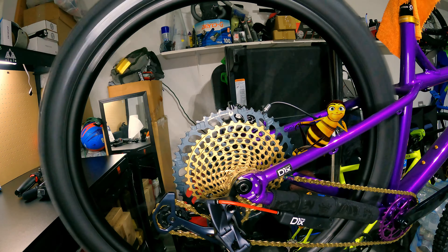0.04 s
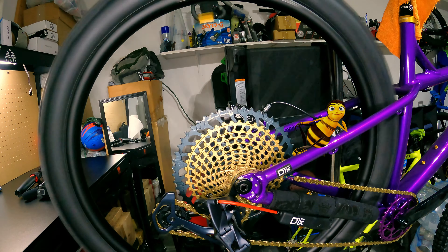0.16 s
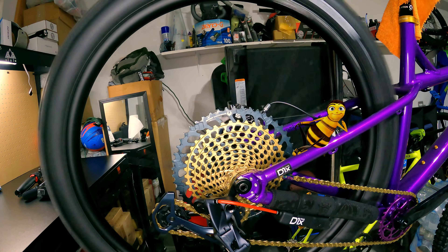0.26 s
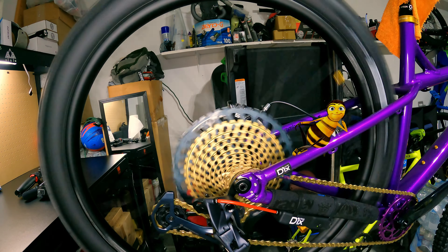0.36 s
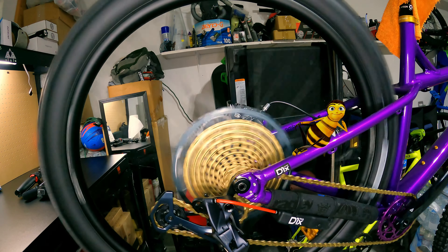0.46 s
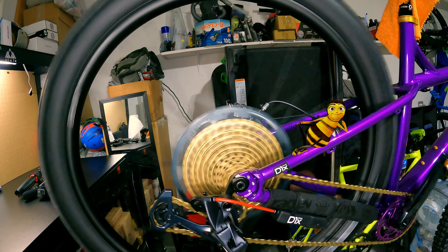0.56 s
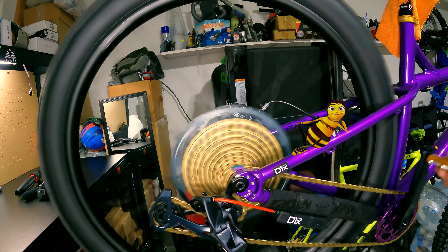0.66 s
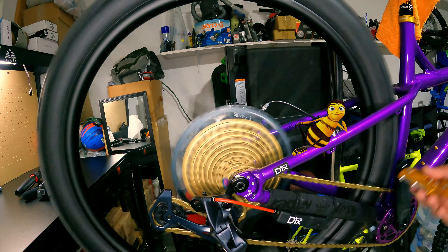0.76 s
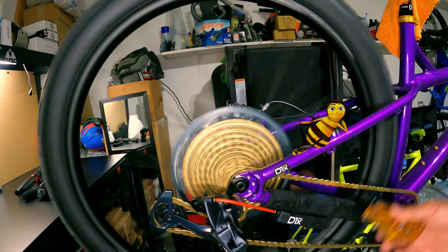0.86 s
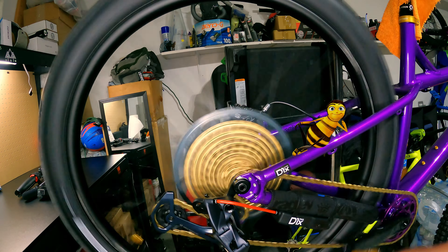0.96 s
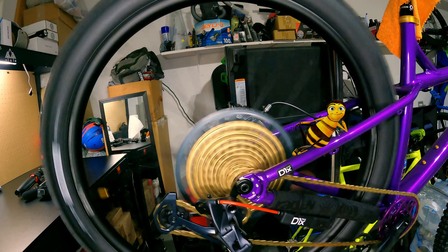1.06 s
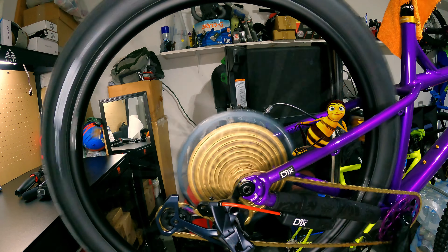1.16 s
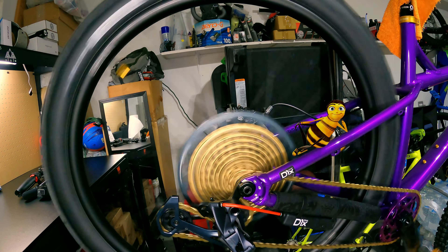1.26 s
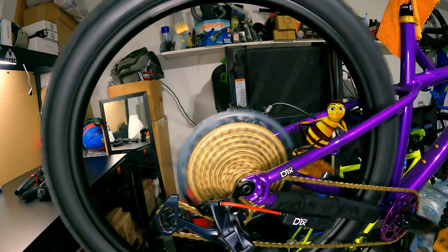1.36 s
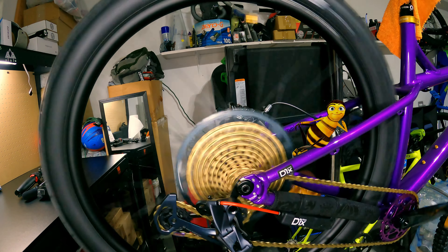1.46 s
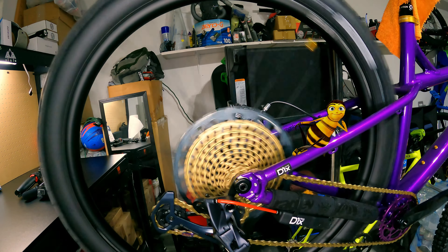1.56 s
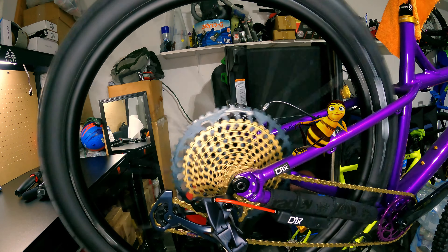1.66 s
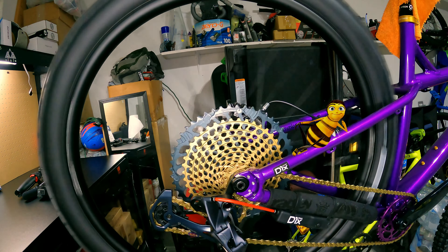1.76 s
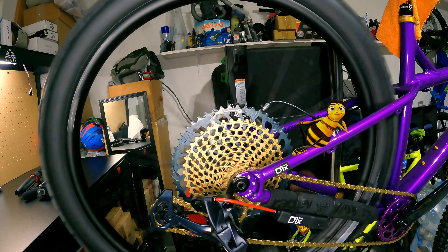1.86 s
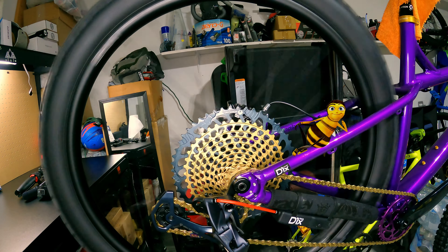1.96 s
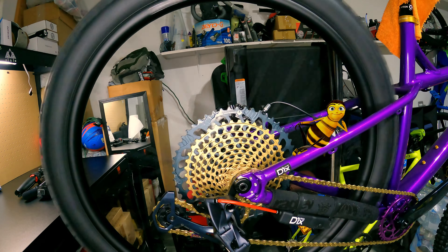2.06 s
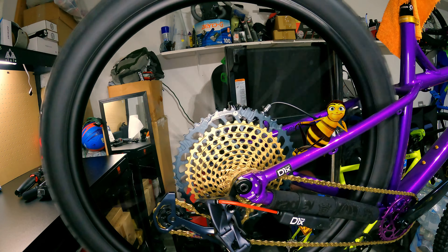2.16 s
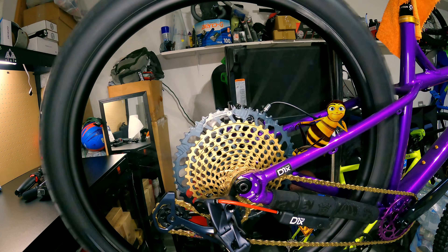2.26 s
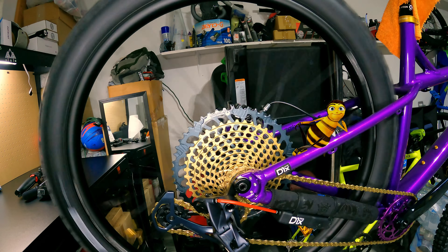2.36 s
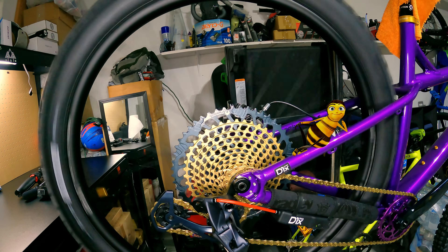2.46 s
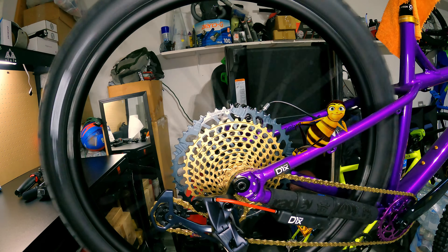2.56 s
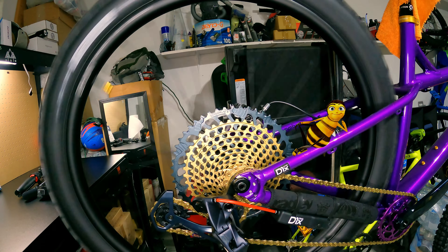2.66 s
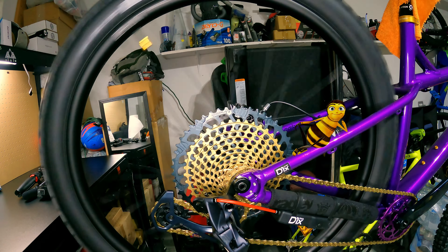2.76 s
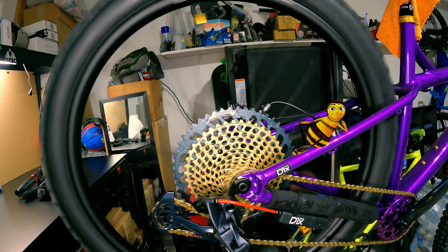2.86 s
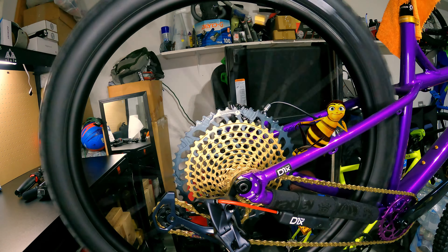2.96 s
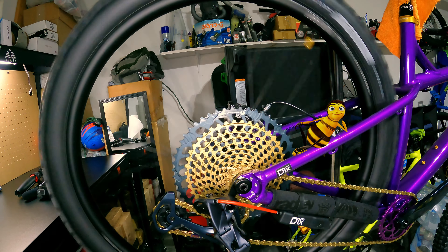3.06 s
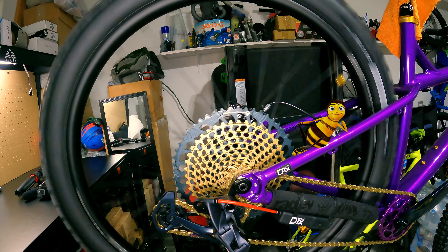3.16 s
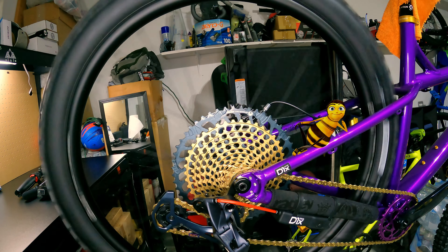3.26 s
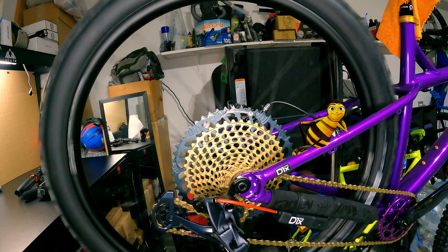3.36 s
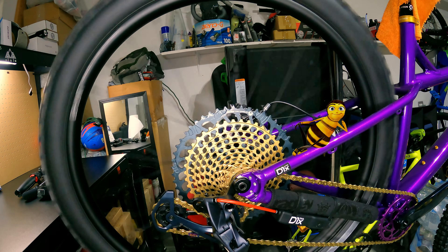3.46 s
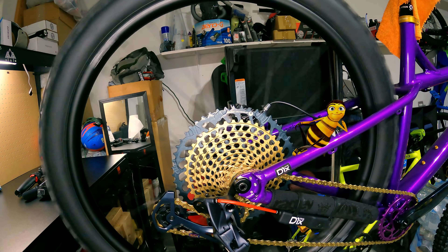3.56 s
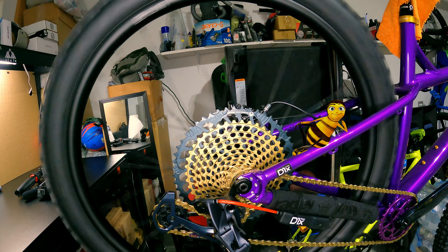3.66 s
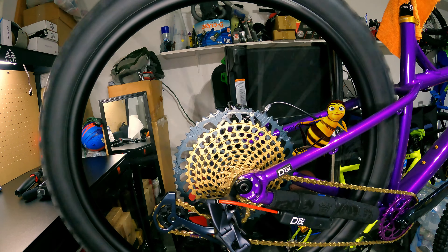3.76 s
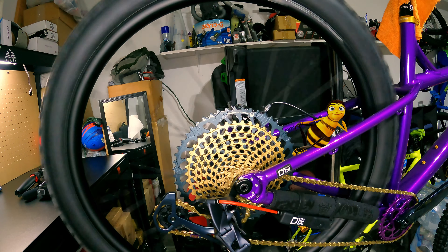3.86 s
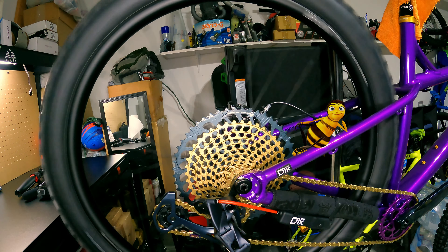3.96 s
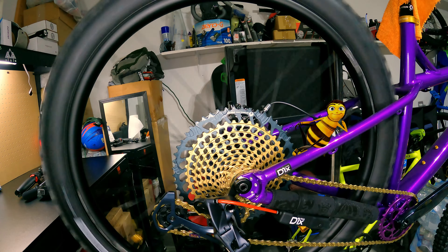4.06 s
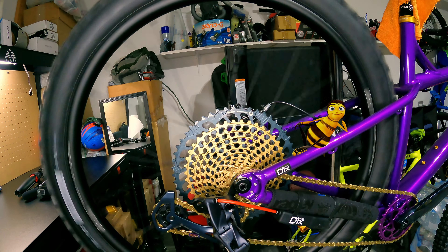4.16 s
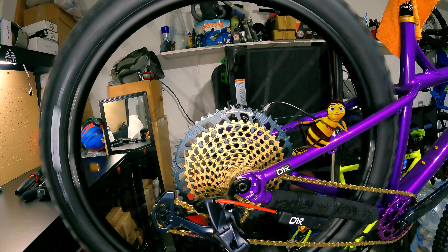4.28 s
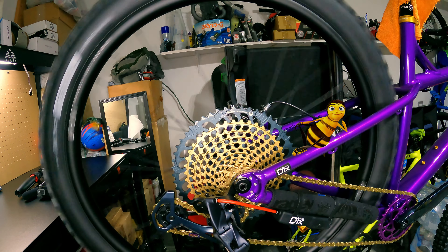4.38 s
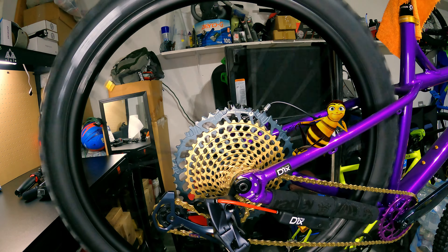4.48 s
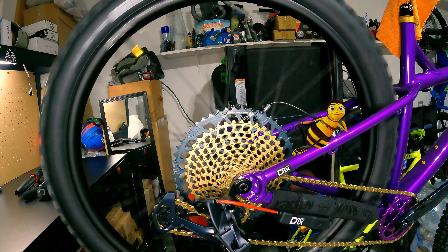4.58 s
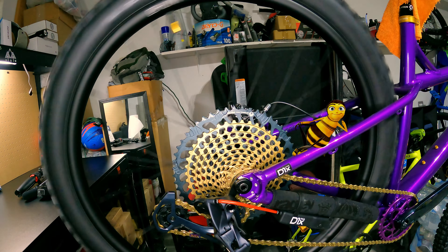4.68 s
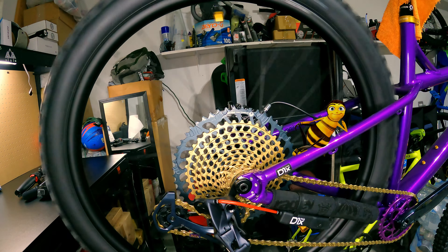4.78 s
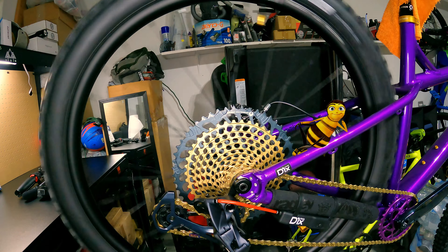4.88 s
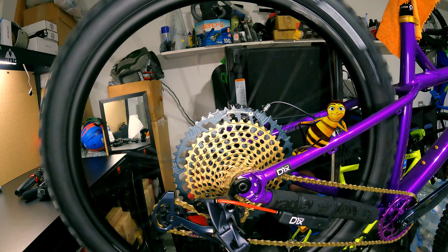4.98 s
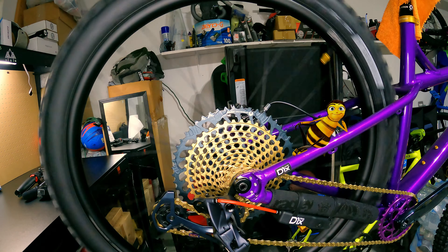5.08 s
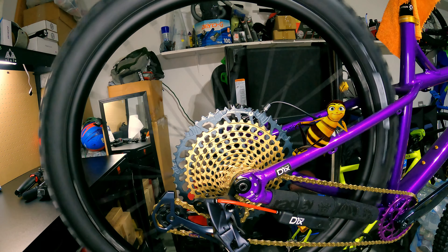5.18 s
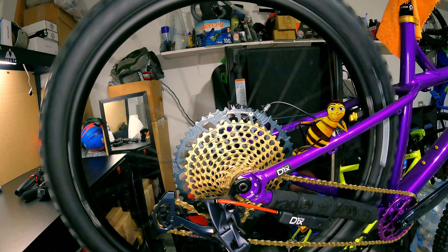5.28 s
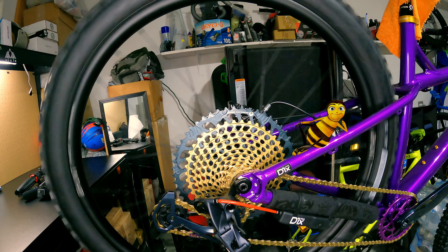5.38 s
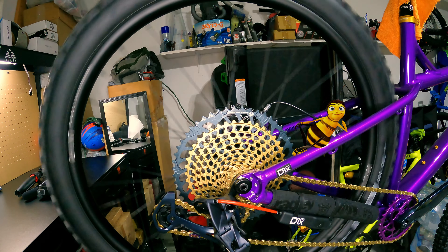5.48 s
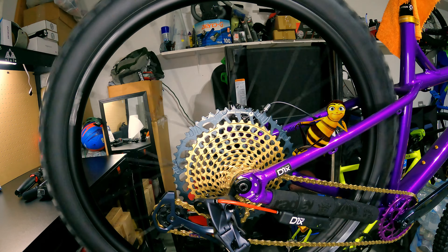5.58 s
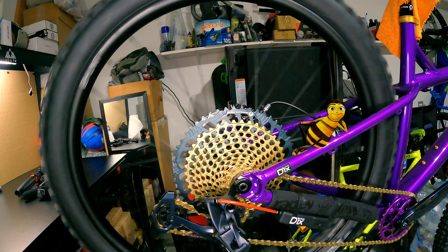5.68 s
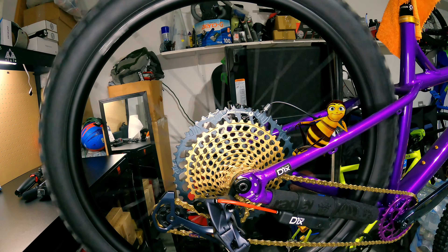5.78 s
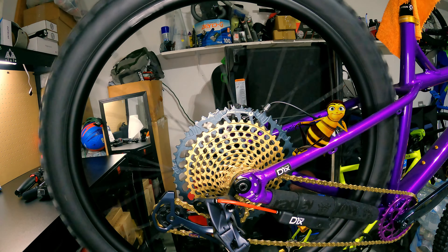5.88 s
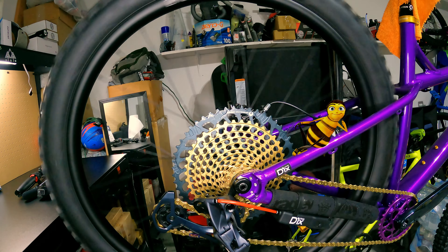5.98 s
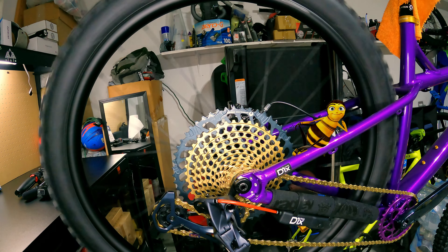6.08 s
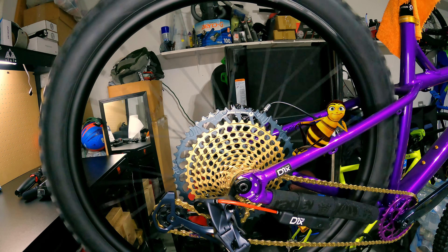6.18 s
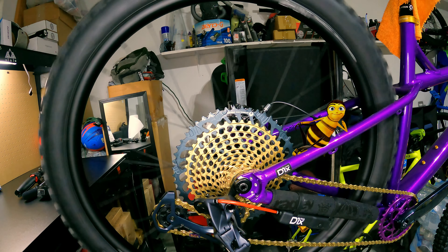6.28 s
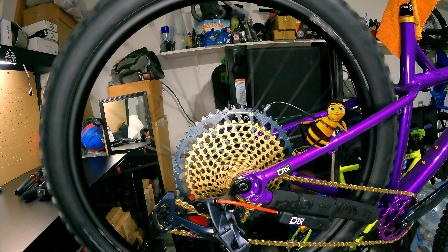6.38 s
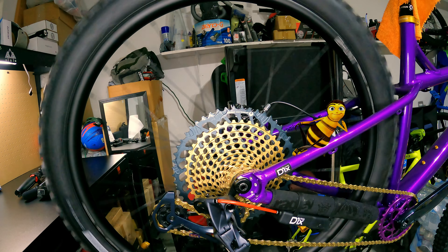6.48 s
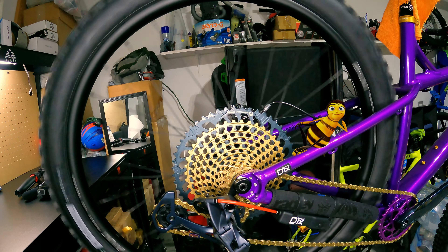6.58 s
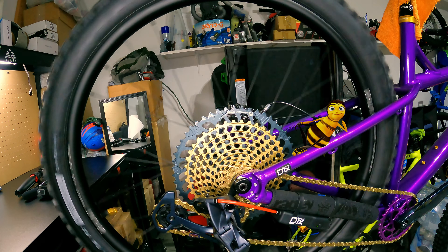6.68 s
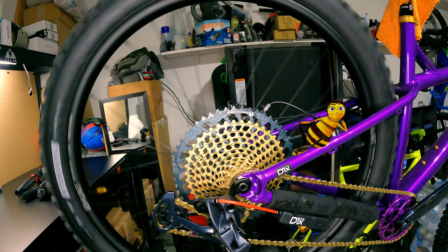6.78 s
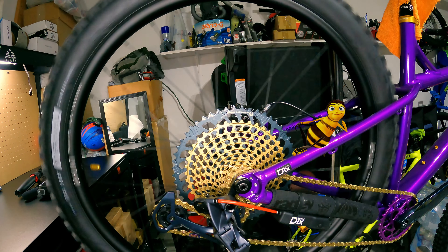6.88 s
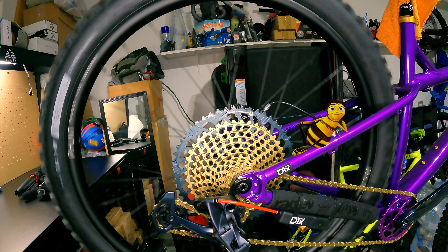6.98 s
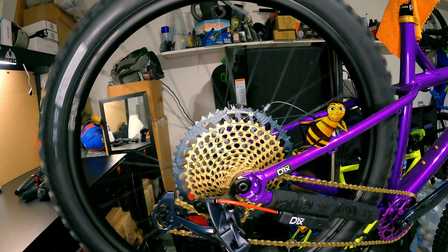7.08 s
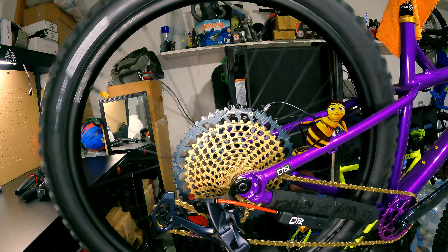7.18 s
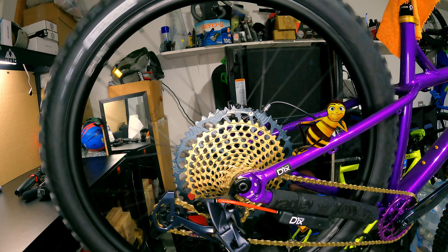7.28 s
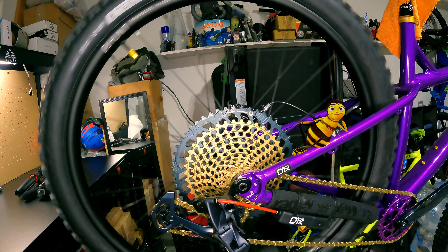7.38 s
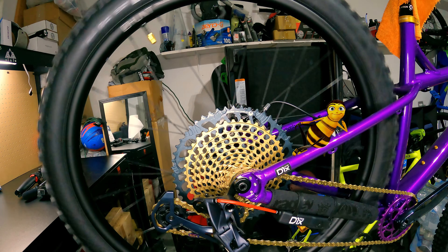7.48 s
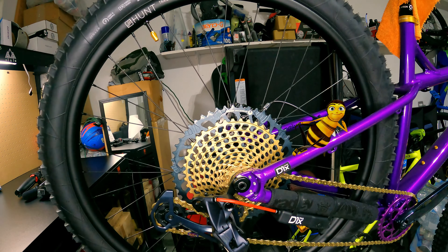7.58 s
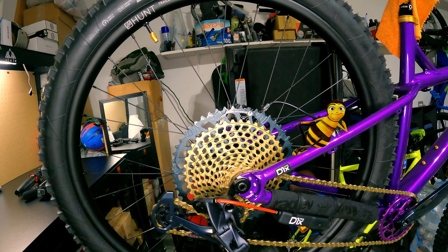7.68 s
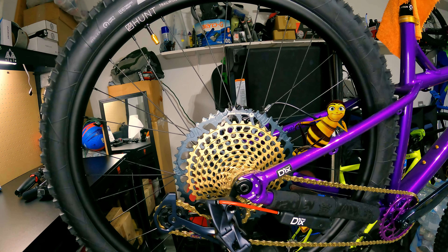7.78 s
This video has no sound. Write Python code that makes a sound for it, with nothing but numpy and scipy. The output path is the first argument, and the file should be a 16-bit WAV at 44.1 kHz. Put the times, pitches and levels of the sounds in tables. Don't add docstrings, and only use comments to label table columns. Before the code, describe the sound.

A fast metallic freewheel buzz starts at once, rises within the first second into a dense ringing whine with a dull chain rumble, then drops before two seconds. The ticking wavers and slows steadily until single clicks stand apart. A hard double knock and faint brake chirps end the spin. One close microphone catches the small room's reflections, steady low hum, soft air noise and dim passing vehicles.

```python
import sys
import numpy as np
from scipy import signal
from scipy.fft import rfft, irfft, next_fast_len
from scipy.io import wavfile
from scipy.ndimage import uniform_filter1d

SR = 44100
rng = np.random.default_rng(int(sys.argv[2]) if len(sys.argv) > 2 else 0)


def level_to_linear(level):
    exponent = np.asarray(level, float) / 20
    return 10 ** exponent


def waveform_to_disk(signal):
    frames = np.transpose(np.atleast_2d(signal))
    scaled = np.clip(frames, -1, 1) * 32767
    samples = np.round(scaled).astype(np.int16)
    wavfile.write(sys.argv[1], SR, samples)


N = 345739


def rms_one(x):
    return x / np.sqrt(np.mean(x ** 2) + 1e-20)


def in_time(rows):
    s, *columns = np.transpose(rows)
    return [np.interp(np.arange(N) / SR, s, c) for c in columns]


def at_hz(points, hz):
    points = np.array(points)
    return np.interp(np.log(hz), np.log(points[:, 0]), points[:, 1])


def ring(clicks, hz, t60):
    r, w = level_to_linear(-60 / (t60 * SR)), 2 * np.pi * hz / SR
    return signal.lfilter([0, np.sin(w)], [1, -2 * r * np.cos(w), r * r], clicks + 1e-18)


def resonate(x, hz, width_hz):
    r = np.exp(-np.pi * width_hz / SR)
    poles = [1, -2 * r * np.cos(2 * np.pi * hz / SR), r * r]
    return signal.lfilter([(1 - r * r) / 2, 0, (r * r - 1) / 2], poles, x + 1e-18)


def band(x, low, high, order=2):
    return signal.sosfilt(signal.butter(order, [low, high], "band", fs=SR, output="sos"), x)


def fading(clicks, t60):
    keep = level_to_linear(-120 / (t60 * SR))
    return np.sqrt(signal.lfilter([1 - keep], [1, -keep], clicks ** 2 + 1e-18))


def wander(n, samples):
    once = uniform_filter1d(rng.standard_normal(n), size=samples)
    return rms_one(uniform_filter1d(once, size=samples))


def pressed_db(knee_db=-26.5, press_share=0.84, recover_s=0.61):
    over = np.maximum(in_time(BUZZ)[0] - knee_db, 0)
    keep = np.exp(-1 / (recover_s * SR))
    return press_share * signal.lfilter([1 - keep], [1, -keep], over, zi=[over[0]])[0]


# [f/Hz, level/dB per Hz]
AIR = [(25, -17), (60, -10), (110, -7), (170, 1), (210, 1.5), (290, -4), (420, -4), (700, -5), (1200, -6.5),
       (2500, -7.5), (4500, -14.5), (8000, -32), (11000, -54), (15000, -58)]


def workshop(air_db=-44, hum_db=-42.5, hum_wander_db=1.6, hum_hz=238.6, hum_width_hz=1.6):
    drift, pressed = wander(N, 9000), pressed_db()
    air_db = air_db - pressed
    hum_db = hum_db - pressed + hum_wander_db * drift
    size = next_fast_len(N)
    hz = np.maximum(np.fft.rfftfreq(size, 1 / SR), 1)
    air = rms_one(irfft(rfft(rng.standard_normal(size)) * level_to_linear(at_hz(AIR, hz)), size)[:N])
    waver = rms_one(resonate(rng.standard_normal(N), hum_hz, hum_width_hz))
    hum = np.sqrt(2) * np.sin(2 * np.pi * hum_hz * np.arange(N) / SR) + 0.36 * waver
    whistle = rms_one(resonate(rng.standard_normal(N), 413.7, 6.8))
    return level_to_linear(air_db + 4.0) * air + level_to_linear(hum_db - 1.5) * hum + level_to_linear(air_db - 13.5) * whistle


# [loudest t/s, half length t/s, level/dB, low f/Hz, high
# f/Hz]
TRAFFIC = [
    (3.3, 0.84, -42, 423, 1600),
    (3.6, 0.57, -50.5, 102, 266),
    (4.7, 0.84, -47.5, 150, 300),
]


def traffic():
    s, out = np.arange(N) / SR, np.zeros(N)
    for top, half, level_db, low_hz, high_hz in TRAFFIC:
        swell = level_to_linear(level_db) * np.exp(-((s - top) / half) ** 2)
        out += swell * rms_one(band(rng.standard_normal(N), low_hz, high_hz))
    return out


# [t/s, speed/ticks per s]
CRANK = [
    (.394, 0),
    (.601, 211.8),
    (.71, 272.3),
    (.88, 326.6),
    (1.089, 455.8),
    (1.294, 459.3),
    (1.345, 445.5),
    (1.487, 345.1),
    (1.874, 0),
]
# [start t/s, fastest t/s, end t/s, speed/ticks per s]
ROCKING = [
    (2.07, 2.346, 2.446, 21.37),
    (2.714, 3.245, 3.438, -19.18),
]


def spin():
    start, friction, drag_s = 107.45, 185.2, 24.25
    heavy_swing, ticks_per_turn, heavy_start_turns = 56.9, 122.72, .291
    s = np.arange(N) / SR
    wheel = (start + friction) * np.exp(-s / drag_s) - friction
    turns = heavy_start_turns + np.cumsum(wheel) / SR / ticks_per_turn
    heavy = heavy_swing * np.sin(2 * np.pi * turns) / wheel
    rocking = sum(np.interp(s, [begin, top, end], [0, speed, 0]) for begin, top, end, speed in ROCKING)
    return wheel + heavy + in_time(CRANK)[0] + rocking


def chain(level_db=-46.5, low_hz=300, high_hz=900):
    speed = in_time(CRANK)[0]
    rumble = rms_one(band(rng.standard_normal(N), low_hz, high_hz))
    return level_to_linear(level_db) * np.sqrt(speed / speed.max()) * rumble


# [t/s, level/dB, f/Hz, length t/s]
SQUEAKS = [
    (7.707, -37, 3520, 0.013),
    (7.745, -38, 3500, .013),
    (7.774, -41, 3590, 0.017),
]


def squeaks():
    out = np.zeros(N)
    for s, level_db, hz, length in SQUEAKS:
        age = np.arange(N) / SR - s
        swell = np.sin(np.pi * np.clip(age / length, 0, 1))
        out += level_to_linear(level_db) * swell * np.sin(2 * np.pi * hz * age)
    return out


# [t/s, peak level/dB]
CLACK = [
    (7.626, -15.5),
    (7.633, -19.5),
]
# [f/Hz, level/dB, t60 t/s]
FRAME = [(410, -13.5, 0.66), (504, -9, 0.83), (870, -16.5, 0.26), (1370, -27, 0.19), (1812, -31, 0.63),
         (1910, -21, 5.0), (2270, -3.5, 0.074), (2606, -17, 0.15), (3310, -7, 0.074), (3060, -7, 0.2),
         (4230, -3.5, 0.1), (5712, -70, 0.17)]


def clack():
    at = [round(s * SR) for s, db in CLACK]
    blows = np.bincount(at, level_to_linear(np.array(CLACK)[:, 1]), N)
    out = np.zeros(N)
    for hz, level_db, t60 in FRAME:
        out += level_to_linear(level_db - 3) * ring(blows, hz, min(.5 * t60, 130 / hz + .02))
    white = rng.standard_normal(N)
    out += level_to_linear(20.0) * fading(blows, 0.055) * band(white, 940, 4000)
    out += level_to_linear(24.0) * fading(blows, 0.31) * band(white, 350, 2600)
    return band(out, 410, 4200)


# [multiple of the tick rate, level/dB]
WHINE = [(1, -7), (1.5, -7), (2, 0), (2.5, -11), (3, 3), (3.5, -13), (4, 0), (4.5, -9), (5, -3), (6, -5)]


def whine(level_db=-19.5, onset_per_s=310, low_db=-27.0):
    per_s = spin()
    fast = slice(0, 2 * SR)
    turned, rate = np.cumsum(per_s)[fast] / SR, per_s[fast]
    out = np.zeros(N)
    for multiple, order_db in WHINE:
        lift = level_to_linear(2 * low_db)
        for hz, width_hz, db in HUB[:6]:
            lift = lift + level_to_linear(2 * db) / (1 + ((multiple * rate - hz) / width_hz) ** 2)
        level = level_to_linear(order_db + 4.0 * wander(len(rate), 1500)) * np.sqrt(lift)
        out[fast] += level * np.sin(2 * np.pi * multiple * turned)
    return level_to_linear(level_db) * np.clip(per_s / onset_per_s - 1, 0, 1) * out


# [place/ticks, level/dB]
PAWLS = [
    (-.19, -5.0),
    (-.15, -3.0),
    (-.09, -3.5),
    (.76, -4.0),
    (.85, -1.5),
    (.98, .5),
]
# [t/s, level/dB]
BUZZ = [(0, -25), (.42, -24), (.59, -19.5), (1.08, -19), (1.36, -19), (1.97, -30.5), (2.25, -27.5),
        (3.1, -29.5), (4.15, -29), (5.5, -31), (7.4, -32), (7.62, -34.5)]


def drops(jitter=.008, wobble=.03, spread_db=1.3, first_tick=1.04, stop_s=7.615):
    per_s, (level_db,) = spin(), in_time(BUZZ)
    turned = first_tick + np.cumsum(per_s) / SR
    place, pawl_db = np.transpose(PAWLS)
    tooth = np.arange(0, turned[-1], 2)[:, None]
    chance = rng.standard_normal((3, len(tooth), len(place)))
    uneven = uniform_filter1d(chance[0], size=5, axis=0)
    when = (tooth + place + wobble * uneven + jitter * chance[1]).ravel()
    at = np.interp(when, turned, np.arange(N)).astype(int)
    drop_db = level_db[at] + (pawl_db + spread_db * chance[2]).ravel()
    strength = level_to_linear(drop_db) * np.sqrt(SR / per_s[at])
    pawl = np.tile(np.arange(len(place)), len(tooth))
    keep = (when > turned[0] - 1) & (at < stop_s * SR)
    return at[keep], pawl[keep], strength[keep]


# [f/Hz, level/dB per Hz]
SNAP = [(800, -35), (1200, -34), (1450, -13.5), (2200, -38.5), (3000, -19), (4500, -18.5), (6500, -19.5),
        (7800, -24), (8600, -67), (9500, -25.5), (11500, -41.5), (12500, -34.5), (15500, -51)]
# [f/Hz, t60 t/s]
SNAP_T60 = [(1000, 0.57), (2500, 0.24), (6000, 0.13), (14000, 0.073)]


def snaps(at, pawl, strength, habit_db=-10.5):
    clicks, once = np.bincount(at, strength, N), np.eye(1, 4000)[0]
    edges = 700 * 2 ** np.arange(0, 4.6, 1 / 3)
    white, seed = rng.standard_normal((2, N)), rng.standard_normal((2, 2, len(once)))
    out, habit = 0, 0
    for k, (low, high) in enumerate(zip(edges, edges[1:])):
        hz = np.sqrt(low * high)
        t60, gain = at_hz(SNAP_T60, hz), level_to_linear(at_hz(SNAP, hz))
        out = out + gain * fading(clicks, t60) * band(white[k % 2], low, high)
        habit = habit + gain * fading(once, t60) * band(seed[k % 2], low, high)
    for k, shape in enumerate(habit):
        own = np.bincount(at, strength * (pawl // 3 == k), N)
        out = out + level_to_linear(habit_db) * signal.oaconvolve(own, shape)[:N]
    return out


# [f/Hz, width f/Hz, level/dB]
HUB = [(1622, 90, -8), (1805, 45, -12), (1965, 45, -5), (2075, 45, -4), (2125, 60, 0), (2341, 40, -3),
       (2480, 20, -13), (2569, 56, -13), (2822, 245, -14), (3206, 56, -12), (3560, 150, -10),
       (3665, 40, -11), (3871, 20, -14), (4089, 57, -10), (4370, 200, -16), (4784, 36, -13),
       (5288, 65, -14), (5624, 62, -14), (6047, 165, -8), (7088, 81, -11), (7301, 155, -15),
       (8080, 203, -19), (9986, 299, -26), (10578, 242, -29), (11287, 269, -27)]


def hub_modes(at, pawl, strength, habit=0.84, rattle=.85, rattle_t60=0.04):
    out = np.zeros(N)
    rattling = rattle * fading(np.bincount(at, strength, N), rattle_t60) * rng.standard_normal((3, N))
    for k, (hz, width_hz, level_db) in enumerate(HUB):
        usual = np.where(rng.random(len(PAWLS)) < .75, 1, -1)[pawl]
        grip = habit * usual + np.sqrt(1 - min(habit, 1) ** 2) * rng.standard_normal(len(at))
        push = np.bincount(at, strength * grip, N) + rattling[k % 3]
        out += level_to_linear(level_db) * (-1) ** k * resonate(push, hz, width_hz)
    return band(out, 1170, 10500, order=3) / np.sqrt(1 + rattle ** 2)


def walls(x, wet_db=-4.5, t60=0.45, dull_hz=6000):
    once = np.eye(1, 16000)[0]
    noise = fading(once, t60) * rng.standard_normal(len(once))
    tail = signal.lfilter(*signal.butter(1, dull_hz, fs=SR), noise)
    return x + level_to_linear(wet_db) * signal.oaconvolve(x, tail)[:N]


def scene():
    hits = drops()
    ratchet = walls(level_to_linear(14.5) * (hub_modes(*hits) + snaps(*hits)))
    background = workshop() + traffic() + chain()
    return np.tile(background + squeaks() + clack() + whine() + ratchet, (2, 1))


def apart(x, share=.12, level_db=-21.5, spread_db=0.5, low_db=1.5, start=764, size=1024):
    upper = band(x, 3000, 11000, order=4)
    stretch = (np.arange(N) + size - start) // size
    starts = np.flatnonzero(np.diff(stretch, prepend=-1))
    chance = rng.standard_normal((len(starts), 2))
    crest = np.maximum.reduceat(upper ** 2, starts) / np.add.reduceat(upper ** 2, starts)
    sharp = crest * level_to_linear(3.0 * chance[:, 0])
    split = sharp > np.quantile(sharp, 1 - share)
    gate = (split * level_to_linear(level_db + spread_db * chance[:, 1]))[stretch]
    noise = band(upper * rng.choice([-1, 1], N), 4050, 8000, order=4)
    runs = uniform_filter1d(rng.standard_normal(len(starts)), size=3)
    low_gate = (runs > np.quantile(runs, 1 - share))[stretch] * level_to_linear(level_db + low_db)
    low = low_gate * band(np.roll(x, size), 25, 800)
    return (gate * noise * level_to_linear(2.5) + low) * [[1], [-1]]


def top_cut(x):
    return signal.sosfilt(signal.butter(12, 15700, fs=SR, output="sos"), x)


def record(dry, notch_hz=9030, notch_width_hz=160, refill_hz=11200):
    size = next_fast_len(N)
    hz, heard = np.fft.rfftfreq(size, 1 / SR), rfft(dry[0], size)
    lost = np.abs(hz - notch_hz) < notch_width_hz / 2
    out = irfft(heard * (hz < refill_hz) * (hz > 22) * level_to_linear(-16.0 * lost), size)
    edges = np.geomspace(refill_hz, 15350, 8)
    noise = rfft(rng.standard_normal((2, size)))
    for low, high in zip(edges, edges[1:]):
        inside = (hz >= low) & (hz < high)
        power = uniform_filter1d(irfft(heard * inside, size) ** 2, size=50)
        level = np.sqrt(np.abs(power))
        out = out + level * rms_one(irfft(noise * inside, size)) * level_to_linear([[2.3], [3.7]])
    return top_cut(out[:, :N] + apart(dry[0]))


dry = scene()
out = record(dry)
waveform_to_disk(out)
```